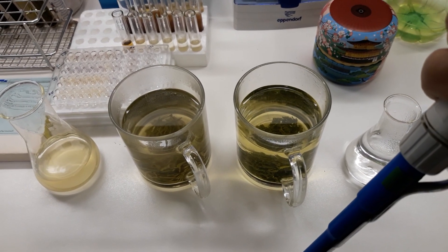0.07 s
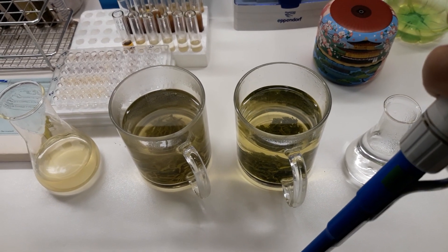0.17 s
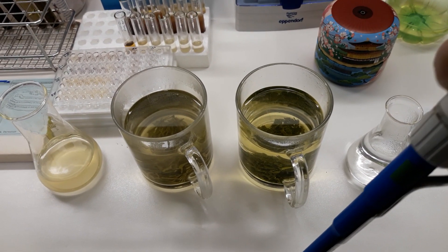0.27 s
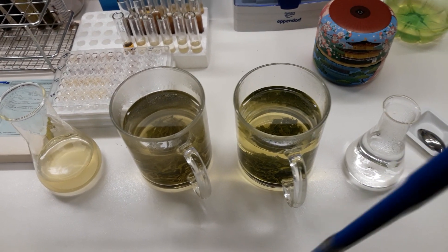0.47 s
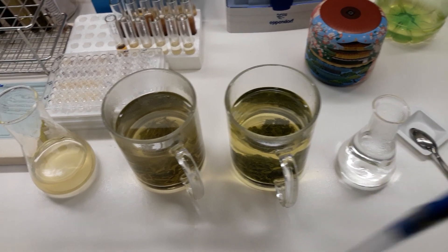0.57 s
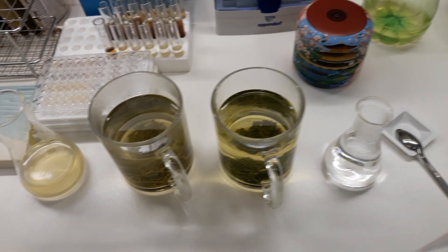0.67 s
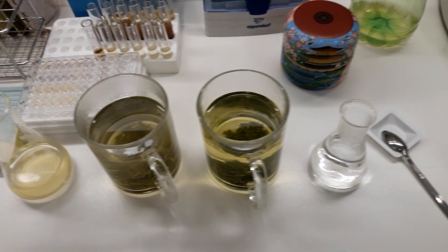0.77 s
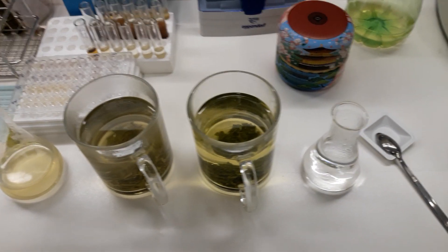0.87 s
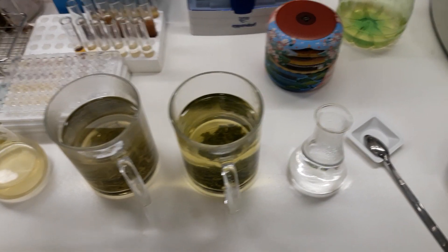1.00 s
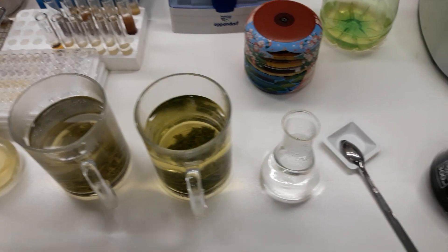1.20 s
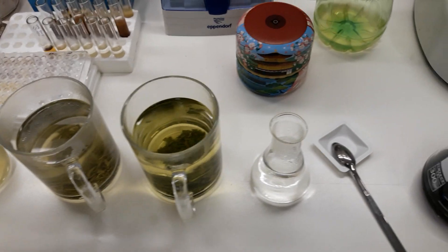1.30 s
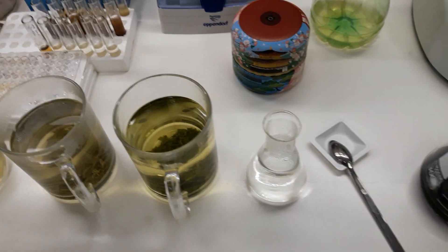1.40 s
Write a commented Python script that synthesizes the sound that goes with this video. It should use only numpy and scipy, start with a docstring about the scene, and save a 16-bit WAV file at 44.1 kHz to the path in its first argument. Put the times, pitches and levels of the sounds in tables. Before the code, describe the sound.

Sharp plastic clicks from a hand-held pipette over a steady laboratory equipment hum.

```python
"""Pipette clicks in a laboratory

A hand-held plastic pipette is worked close by in a small, hard-walled room. Its plunger catches,
snaps loudly and later ticks once; each click rings the barrel, the spring and the room. The hand knocks
softly on the barrel. Motor-driven equipment hums and whines faintly over the ventilation noise."""
import sys
import numpy as np
from scipy import signal
from scipy.fft import rfft, irfft
from scipy.io import wavfile
from scipy.ndimage import uniform_filter1d

SR = 44100
rng = np.random.default_rng(int(sys.argv[2]) if len(sys.argv) > 2 else 0)


def file_out(sig):
    """Save sig as 16-bit WAV at sys.argv[1]."""
    # one column per channel
    cols = np.atleast_2d(sig).T
    # limit, then scale
    lim = np.clip(cols, -1, 1)
    pcm = np.round(lim * 32767).astype(np.int16)
    wavfile.write(sys.argv[1], SR, pcm)


N = 63945

# A "colour" says how strong each pitch is compared with the others.
# steady moving air (frequency [Hz], level [dB])
AIR_COLOUR = [(20, -50), (36, -37), (47, -2), (75, -11), (110, -1), (175, 3), (215, -2.5), (290, -4),
              (350, -6), (430, -13), (700, -17.5), (1100, -23), (1500, -22), (1850, -14.5), (2300, -18.5),
              (2700, -23), (3400, -21), (4100, -27.5), (5000, -21), (6000, -28.5), (8300, -28), (9500, -45),
              (13000, -39), (15500, -37.5)]
# a low rumble (frequency [Hz], level [dB])
RUMBLE_COLOUR = [(35, -40), (75, -16.5), (115, 2.5), (175, -1), (230, -10), (340, -11.5), (600, -20),
                 (3000, -56)]
# the rumble eases off (time [s], level [dB])
RUMBLE_SWELL = [(0, -56), (.4, -54.5), (.7, -56), (.9, -64.5), (1.45, -61.5)]
# a hollow rush (frequency [Hz], level [dB])
RUSH_COLOUR = [(250, -30), (550, 0), (780, -4), (1050, -20), (2500, -45)]
# the rush swells, dips and grows again (time [s], level [dB])
RUSH_SWELL = [(0, -89), (.5, -68.5), (.9, -79), (1.2, -73.5), (1.45, -73)]
# a soft hiss (frequency [Hz], level [dB])
HISS_COLOUR = [(1200, -21.5), (1900, -1), (2350, 1), (2700, -2.5), (3300, -2.5), (3560, 3.5), (3850, 0.5),
               (4400, 1), (5200, -4), (8000, -17), (10000, -27.5), (16000, -21.5)]
# the hiss swells twice and fades (time [s], level [dB])
HISS_SWELL = [(0, -74), (.45, -57.5), (.7, -64), (.92, -61.5), (1.15, -68), (1.45, -70)]
# tones of the motor hum (frequency [Hz], level [dB], size of the waver [dB])
HUM_TONES = [(98.9, -60, 0), (100.86, -60.5, 4.5), (149.2, -58, 1), (196.2, -60.5, 0), (245.6, -52.5, 0),
             (329, -67, 4.5), (745, -81, 4), (1720, -76, 1), (1900, -84, -5), (1910, -78.5, -1)]
# two thin whines swell and fade (time [s], lower tone's level [dB], higher tone's level [dB])
WHINE_SWELL = [(0, -71, -76), (.6, -69, -70.5), (.75, -70, -69), (.9, -68, -64.5), (1.15, -88.5, -76),
               (1.3, -93, -78), (1.45, -89.5, -92)]
# the hand knocks on the barrel (time [s], gain [dB], fade time [s], bass gain [dB])
HAND_KNOCKS = [(0.0977, -54, 0.013, -6), (0.2783, -47, 0.072, 2), (0.2799, -44, 0.018, -1.5),
               (0.4128, -43, 0.018, -18), (0.606, -59, 0.072, -14), (0.676, -57, 0.05, -7)]
# the dull sound of a knock (frequency [Hz], level [dB])
DULL_COLOUR = [(60, -25), (150, 0), (450, -6), (800, -1), (1200, -2), (1700, 1), (2100, 1), (2600, 0),
               (2950, -14), (4600, -8), (5600, -17), (9000, -28), (16000, -30)]
# plunger clicks (time [s], gain [dB], rattle gain [dB], rattle fade time [s],
# ten gains, one for each of CLICK_BANDS_HZ [dB], gain of room and spring [dB])
PLUNGER_CLICKS = [(0.2317, -12.5, 2, 0.024, 4, -0.5, 0.5, -11, 1.5, -15, -1, -21, -0.83, -7.5, -0.5),
                  (0.349, 0.5, -1, 0.018, -1, -0.5, 0, -1.5, 0, 0, 2.5, 1, -0.2, 3, 0),
                  (0.832, -28.5, 5, 0.022, -7, -15.5, -11.5, -8, -2.5, 3, -2.5, -10, -2, -3.5, -2.5)]
# pitches at which each click is turned up or down (frequency [Hz])
CLICK_BANDS_HZ = (1250, 1850, 2450, 3640, 5020, 7400, 8600, 10000, 11400, 14500)
# the sharp crack of the plunger stopping (frequency [Hz], level [dB])
STOP_COLOUR = [(200, -24.5), (800, -16.5), (1400, -6.5), (2200, 2), (4700, 5), (6500, 2.5), (8400, 3),
               (9700, -8.5), (13000, -11.5), (15500, -24)]
# ringing tones of the plastic barrel (frequency [Hz], relative level [dB], fade time [s])
BARREL_TONES = [(1246, -11.5, 0.026), (1736, -3, 0.024), (1988, 2, 0.016), (2482, -10, 0.014),
                (2700, -5, 0.014), (3150, 3.5, 0.02376), (3730, -5, 0.0097), (4500, 2.5, 0.014),
                (5300, -2, .015), (5530, -5, 0.018), (6070, -12.5, 0.0271), (7320, 1.5, 0.018),
                (8000, 1, 0.0161), (8820, -5, 0.017), (14300, -10.5, 0.014), (15270, -10, 0.023)]
# long, thin ring of the steel return spring (frequency [Hz], relative level [dB], fade time [s])
SPRING_TONES = [(3193, 1, 0.37), (4390, -8.5, 0.39), (4530, -0.5, 0.34), (4740, -5, 0.25),
                (5240, -5.5, 0.58), (5160, -20, 0.35), (7000, 1, .4), (7700, 2.5, 0.36), (7630, -4, 0.33),
                (8000, -2, 0.48)]
# first echoes from bench and walls (delay [s], gain [dB])
ECHOES = [(0.0106, -15), (0.0167, -15.5)]
# how those surfaces colour the echoes (frequency [Hz], gain [dB])
ECHO_COLOUR = [(2000, -1.5), (4500, 7.5), (8000, -12.5), (14000, -2.5)]
# the room's lingering ring (frequency [Hz], relative level [dB], fade time [s])
ROOM_BANDS = [(401, -7.5, 1), (1030, -7.5, 0.55), (2043, 2.5, 0.43), (2780, -7.5, 0.47), (3000, 4.5, 0.57),
              (3560, -4, 0.34), (4327, 7, 0.5), (5100, 5, 0.5), (5360, 4.5, 0.36), (7000, 2, 0.54),
              (7460, 9.5, 0.41), (8530, 5, 0.4), (9400, -7.5, 0.36), (12900, -11.5, 0.26),
              (15000, -3, 0.28), (16000, -6, 0.17)]


def undb(db):
    """Turn decibels into a number to multiply by."""
    return 10 ** (np.asarray(db) / 20)


def unit(x):
    """Scale a signal to an average (rms) size of 1."""
    return x / np.sqrt(np.mean(x ** 2))


def fade(fade_s):
    """Die away from 1, dropping 60 dB over the fade time."""
    return undb(-60 * np.arange(N) / SR / fade_s)


def delay(x, s):
    """The same sound, s seconds later."""
    return np.concatenate([np.zeros(max(int(round(s * SR)), 0)), x])[:N]


def gains(points):
    """Join the points of a colour into a gain for every frequency."""
    hz, db = np.array(points).T
    all_hz = np.arange(N + 1) * SR / (2 * N)
    return undb(np.interp(np.log(all_hz + 1), np.log(hz), db))


def colour(x, points):
    """Filter a sound to give it a colour."""
    cepstrum = irfft(np.log(gains(points)))
    # fold the filter so that it rings after a hit, never before
    cepstrum[1:N] *= 2
    cepstrum[N + 1:] = 0
    return irfft(rfft(x, 2 * N) * np.exp(rfft(cepstrum)))[:N]


def air(points):
    """Moving air makes steady noise, here with the given colour."""
    spectrum = rfft(rng.standard_normal(2 * N))
    return unit(irfft(spectrum * gains(points))[:N])


def swell(points):
    """A gain that glides through (time [s], level [dB]) points."""
    times, db = np.array(points).T
    return undb(np.interp(np.arange(N) / SR, times, db))


def ventilation(steady_db=-55):
    """Steady moving air, with a rumble, a hollow rush and a soft hiss that come and go."""
    steady = air(AIR_COLOUR) * undb(steady_db)
    rumble = air(RUMBLE_COLOUR) * swell(RUMBLE_SWELL)
    rush = air(RUSH_COLOUR) * swell(RUSH_SWELL)
    hiss = air(HISS_COLOUR) * swell(HISS_SWELL)
    return steady + rumble + rush + hiss


def drift(per_s):
    """A smooth random wander, about 1 in size."""
    gap = int(SR / per_s)
    steps = rng.standard_normal(256)
    path = np.interp(np.arange(N) / gap, np.arange(len(steps)), steps)
    return unit(uniform_filter1d(path, gap))


def tone(hz):
    """A pure tone with a steady or moving pitch."""
    cycles = np.cumsum(hz * np.ones(N)) / SR + rng.random()
    return np.sqrt(2) * np.sin(2 * np.pi * cycles)


def motor_hum():
    """Turning motors hum with several tones, most of them wavering in loudness."""
    return sum(undb(db + waver_db * drift(per_s=6.66)) * tone(hz) for hz, db, waver_db in HUM_TONES)


def motor_whine(pitches_hz=(2354, 3585), waver_hz=9):
    """The equipment gives off two thin whines of unsteady pitch."""
    times, *levels = np.array(WHINE_SWELL).T
    return sum(swell(list(zip(times, db))) * tone(hz + waver_hz * drift(per_s=45))
               for hz, db in zip(pitches_hz, levels))


def hand_knocks(attack_s=0.00063, push_db=16):
    """The hand meets the plastic with a dull push and a short scuff, some fuller than others."""
    rise = 1 - np.exp(-np.arange(N) / SR / attack_s)
    push = undb(push_db) * signal.unit_impulse(N)
    out = np.zeros(N)
    for start_s, db, fade_s, bass_db in HAND_KNOCKS:
        scuff = rng.standard_normal(N) * rise * fade(fade_s)
        knock = colour(push + scuff, DULL_COLOUR)
        knock = colour(knock, [(1001, bass_db), (1700, 0)])
        out += undb(db) * delay(knock, start_s)
    filter_gain = np.sqrt(np.mean(gains(DULL_COLOUR) ** 2))
    return out * 2 / filter_gain


def ring(tones):
    """A struck part rings with its own tones, each dying away at its own speed."""
    t = np.arange(N) / SR
    return sum((-1) ** k * undb(db) * fade(fade_s) * np.sin(2 * np.pi * hz * t)
               for k, (hz, db, fade_s) in enumerate(tones))


def click(rattle_db, rattle_fade_s, tail_db, rebound_s=0.0019):
    """A hard stop and its rebound ring barrel and spring while loose parts rattle; the room answers."""
    stop = undb(-8) * signal.unit_impulse(N)
    rebound = undb(-3) * delay(stop, rebound_s)
    rattle = undb(rattle_db - 12) * rng.standard_normal(N) * fade(rattle_fade_s)
    crack = colour(stop + rebound + rattle, STOP_COLOUR)
    barrel = undb(-17) * ring(BARREL_TONES)
    spring = undb(-43.5) * ring(SPRING_TONES)
    echoes = sum(undb(db) * delay(crack, s) for s, db in ECHOES)
    tail = colour(echoes, ECHO_COLOUR) + room_ring() + spring
    return crack + barrel + undb(tail_db) * tail


def room_ring(gain_db=-32, onset_s=0.004):
    """Many bounces off hard walls blur into noise whose treble fades first."""
    spectrum = rfft(rng.standard_normal(N))
    all_hz = np.arange(N // 2 + 1) * SR / N
    hz, levels_db, fades_s = np.array(ROOM_BANDS).T
    bands = [irfft(spectrum * np.interp(all_hz, hz, pick), N) * undb(db)
             for pick, db in zip(np.eye(len(hz)), levels_db)]
    tail = sum(band * fade(s) for band, s in zip(bands, fades_s)) / np.std(sum(bands))
    early_boost = 1 + undb(-8.5) * fade(fade_s=0.19)
    return delay(tail * early_boost, onset_s) * undb(gain_db)


def pipette():
    """The plunger clicks three times, each with its own strength and brightness."""
    out = np.zeros(N)
    for start_s, db, rattle_db, rattle_fade_s, *bands_db, tail_db in PLUNGER_CLICKS:
        sound = click(rattle_db, rattle_fade_s, tail_db)
        sound = colour(sound, list(zip(CLICK_BANDS_HZ, bands_db)))
        out += undb(db) * delay(sound, start_s)
    return out


def scene():
    """The pipette over the sound of the laboratory, in one channel."""
    return (ventilation() + motor_hum() + motor_whine() + pipette() + hand_knocks())[None]


def record(dry, top_hz=15750):
    """A steep filter cuts the highest treble."""
    return signal.sosfilt(signal.ellip(8, .2, 70, top_hz, fs=SR, output="sos"), dry)


dry = scene()
out = record(dry)
file_out(out)
```